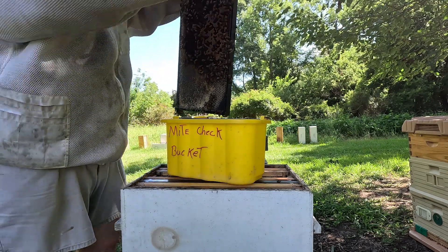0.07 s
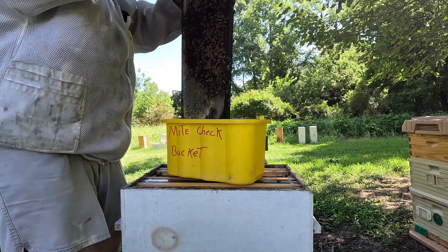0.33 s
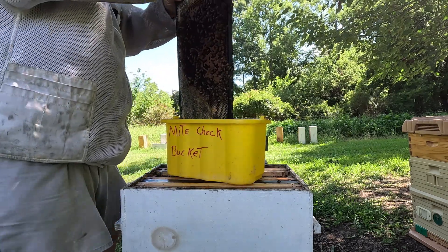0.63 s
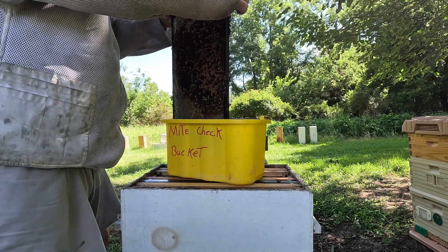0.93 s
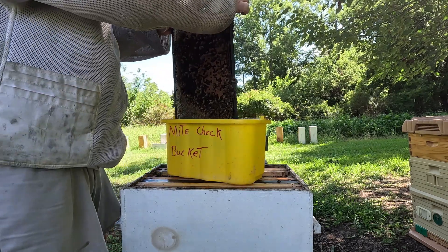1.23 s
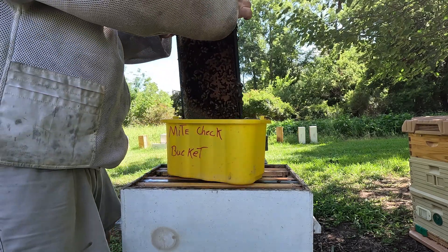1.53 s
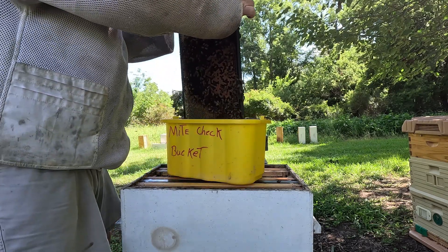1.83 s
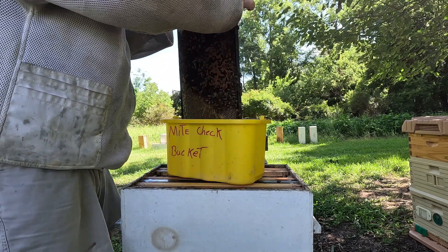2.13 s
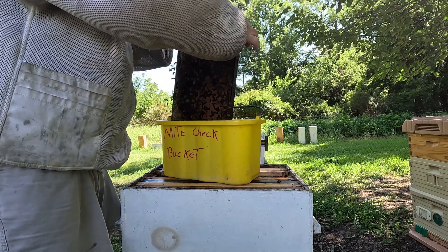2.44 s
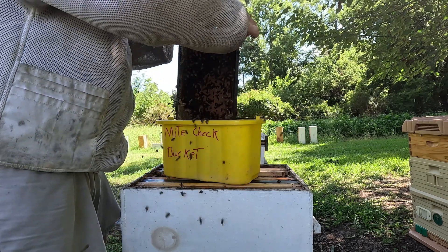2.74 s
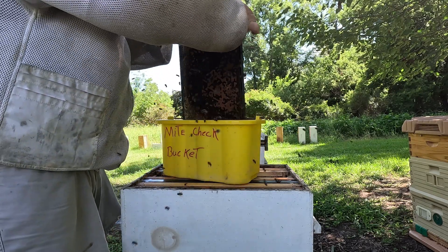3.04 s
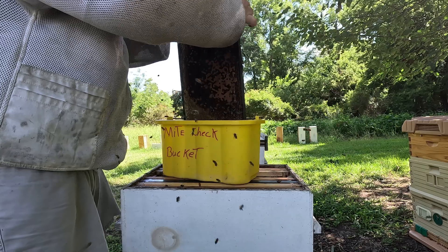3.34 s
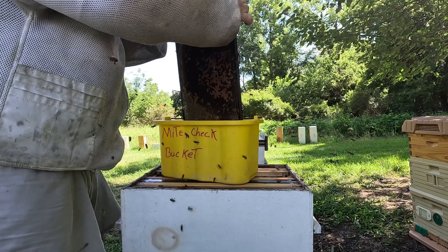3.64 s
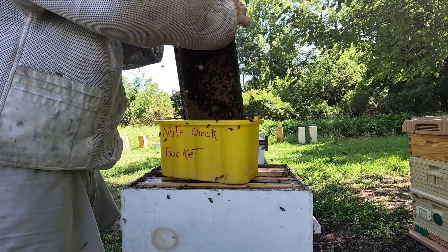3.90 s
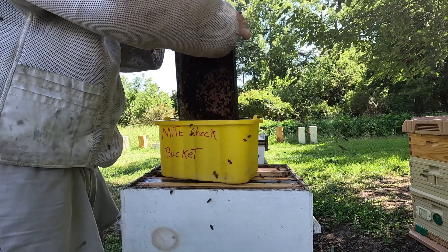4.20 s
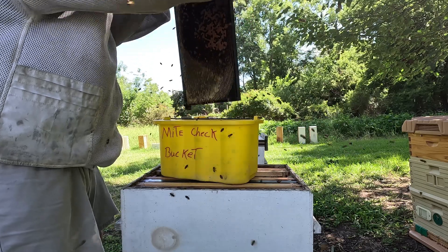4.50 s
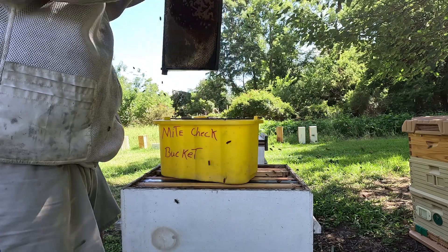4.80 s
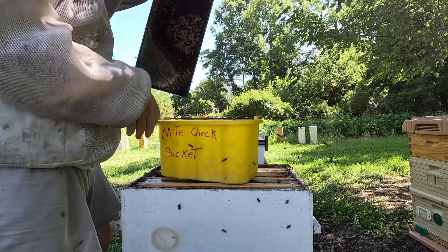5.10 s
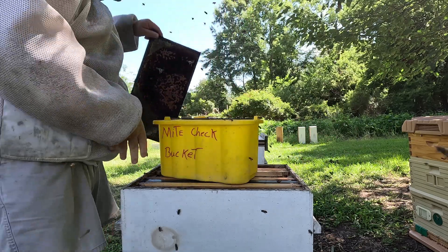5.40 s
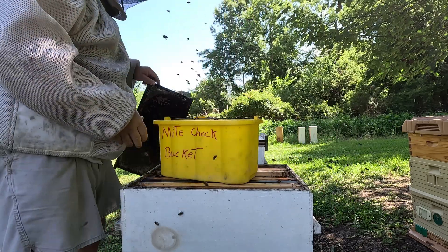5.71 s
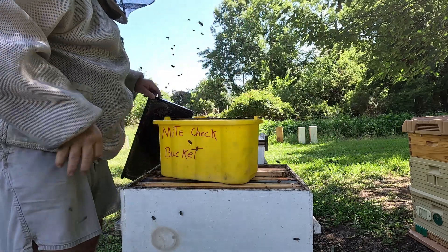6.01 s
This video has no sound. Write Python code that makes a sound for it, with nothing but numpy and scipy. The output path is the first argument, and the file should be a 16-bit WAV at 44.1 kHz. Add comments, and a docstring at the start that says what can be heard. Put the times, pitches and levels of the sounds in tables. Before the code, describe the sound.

Outdoors, insects hiss over a far rumble, with a soft sleeve swish, faint birds and a few light taps. Then a wooden hive frame is banged into a plastic bucket about seven times, each blow a crack and hollow boom with a short rattle, close and loud enough to overload the microphone. Steel clinks once. Bees patter on the plastic and rise into a buzz that continues after the knocking, some passing close.

```python
"""Outdoors at a beehive, a wooden frame is knocked hard into a plastic bucket standing on a hive box.
Each blow is a crack of wood, a clack of the wall and a hollow boom of bucket and box, with a rattle of
rebounds behind it; once a piece of steel clinks. Shaken bees patter on the plastic and buzz up in and
around the bucket, one pulse a wingbeat. Underneath: summer insect hiss, a far rumble, a few birds
and a brush of sleeve at the start. The big hits duck the mix and overload it."""
import sys
import numpy as np
from scipy import signal
from scipy.fft import rfft, irfft, next_fast_len
from scipy.io import wavfile
from scipy.ndimage import uniform_filter1d

SR = 44100
rng = np.random.default_rng(int(sys.argv[2]) if len(sys.argv) > 2 else 0)


def wav_out(sig):
    """Save sig, one row per channel (or a flat mono array), as 16-bit PCM at SR to the path in sys.argv[1]."""
    wavfile.write(sys.argv[1], SR, np.round(np.clip(np.atleast_2d(sig).T, -1, 1) * 32767).astype(np.int16))


N = 266893

# frame on bucket: t/s, force/dB, slap/dB and boom/dB over the force, hardness/(dB per octave),
# slap pitch ratio, first rebound/dB over the force
BLOWS = [(0.501, -27.5, 5, 9, -8, 0.86, -9), (.750, -44, 18.5, 3, 0, 1.08, -21),
         (0.784, -29.5, 10.5, 1, 6, 0.99, -14.5), (.927, -35.5, 7.5, 2, 6, 1.05, -16),
         (2.400, -4.5, 8, 17.5, 8, 1.04, -13), (2.407, 4, 12.5, -4.5, 5, 0.82, -17),
         (2.417, -1, 10.5, -13, 9, .68, -17), (2.433, -1.5, 3.5, -5, -17, .79, -21),
         (2.456, -6, 9.5, 8, 3.5, 1.02, -6), (2.487, -15, -6, 9, 2, .85, -7),
         (2.518, -15.5, -2, 6, 0, 1.3, -8), (2.592, -6.5, 7.5, -0.5, 13, 0.986, -15),
         (2.723, -34.5, 19.5, -3, 8, 1.15, -24), (2.921, -30, 15.5, -8, 4, 1.04, -28),
         (2.982, 1, 13, 4.5, -4.5, 1.045, -14), (3.067, -24, 13, -1, -3, 1.09, -23),
         (3.159, -21.5, 6, 3, 3, 1, -14), (3.294, -1, 14.5, 5, -0.5, 1.06, -13),
         (3.445, -28.5, 14, 5, 2, 1.08, -11), (3.544, 0.5, 16, 5.5, -0.5, 1.029, -13.5),
         (3.622, -19.5, 5, 11, -1, 0.94, -4), (3.664, -14, 3.5, -2, 1, 1.13, -9.5),
         (3.778, -19.5, 10, -3, 2, 0.78, -24), (3.806, -3, 6, 2.5, 6.5, 1.02, -10),
         (3.951, -28, -7, -12, 2, 1.1, -30), (4.033, -1, 13, 5.5, 0.5, 1.013, -11.5),
         (4.278, -2.5, 9.5, 10.5, 2, 1.05, -12), (4.322, -11, 17, -5, 1, 0.97, -5.5),
         (4.337, -15.5, -3, -4, 11, 2, -17), (4.457, -33.5, 30.5, 16, 1, 0.84, -28)]
# resonances: f/Hz, relative level/dB, t60/s
BOOM_MODES = [(100.1, -14.5, 0.18), (126.4, -13, 0.2), (167.6, -11.5, 0.16), (214, -1, .15),
              (256, -2.5, 0.15), (317.3, 0.5, 0.13), (352.4, -4, 0.13), (394, -4.5, 0.085),
              (429, -19, 0.25), (482.5, -18.5, 0.29)]  # bucket and hive box
WALL_MODES = [(634, -37, 0.038), (703, 4.5, 0.098), (745, -2, 0.039), (880, -22, 0.045), (905, -6, .06),
              (1115, -3.5, 0.099), (1198, -12, 0.054), (1412, -6.5, 0.1), (1943, -18, 0.086),
              (2420, -10.5, 0.035)]  # plastic wall
STEEL_MODES = [(3280, -3, .08), (4360, 25, 0.018), (4660, -9, .1), (7100, 1, 0.11), (8350, 0, 0.11),
               (10620, -6, 0.088), (10800, -10, 0.21), (11750, -9, 0.14), (12600, 1, 0.17),
               (13260, 2, 0.11), (15130, -7, .18)]  # the clink
# EQ curves: f/Hz, relative level/dB
CLACK_EQ = [(300, -16), (560, 7.5), (740, 4), (1150, 3.5), (1700, -4), (2400, -12.5), (2900, -24.5),
            (6000, -69)]  # dense ringing of the wall
CRACK_EQ = [(1200, -2.5), (2300, -15), (2900, -2.5), (4300, -1), (6000, -6.5), (8000, -12.5),
            (11000, -22.5), (16000, -28)]  # wood on impact
PATTER_EQ = [(250, -14), (420, 2), (560, 1), (720, 11), (1100, 4), (1600, -6.5), (2400, -3.5),
             (3200, -25.5), (5000, -33), (12000, -61)]  # bees landing on plastic
HUM_EQ = [(150, -41), (225, -11), (320, 18.5), (425, -1), (490, 2.5), (560, -8.5), (690, -19), (850, -22),
          (2000, -72)]  # bees in the bucket and close by
RASP_EQ = [(150, -23), (240, 7), (290, -3.5), (350, 3.5), (480, 9), (560, -1.5), (700, 1), (900, -1.5),
           (1150, -1.5), (1650, -5), (2100, -10.5), (2700, -16), (4500, -45), (8000, -51), (16000, -42)]  # bees in flight
RUSTLE_EQ = [(300, -14), (1200, 16.5), (2700, 1), (4500, 2.5), (7500, -2), (10000, -0.5), (11500, -8),
             (15500, -10)]  # wings and legs
INSECT_EQ = [(1800, -26), (2550, -6), (2900, 0.5), (3900, -2.5), (4650, 0.5), (5100, -1), (6000, -0.5),
             (7500, -7.5), (8600, -1.5), (9300, -7), (10500, -3.5), (11300, -16), (16000, -21)]  # summer hiss
RUMBLE_EQ = [(12, -44), (20, -14.5), (97, -6), (151, -13.5), (200, -7.5), (221, -20), (299, -16),
             (380, -11), (464, -20), (782, -23), (1190, -27), (1400, -27.5), (2090, -32.5), (2220, -33.5),
             (2400, -39.5), (3120, -49), (5280, -120)]  # far low end
# single bees passing close: t/s, wingbeat f/Hz, glide/(Hz per s), level/dB
FLYBYS = [(4.52, 207.2, 97.5, -31), (4.72, 214, -60.5, -35.5), (4.955, 218.8, 109.5, -35.5),
          (5.12, 214, 18.5, -39), (5.322, 216.2, -130, -33.5), (5.44, 213.7, -89.5, -37.5),
          (5.78, 222, 90, -44)]
# a bird's two-note call: t/s, upslur level/dB, whistle level/dB
BIRD_CALLS = [(.342, -58, -58.5), (.756, -58, -58.5), (1.01, -49, -64.5), (1.70, -59, -60.5),
              (1.963, -53, -67)]
# its two notes: delay/s, length/s, start f/Hz, middle f/Hz, end f/Hz
CALL_NOTES = [(0, 0.03, 2270, 2420, 2560), (0.061, 0.1, 2177, 2085, 2110)]
# another bird's thin high whistles: t/s, length/s, start f/Hz, middle f/Hz, end f/Hz, level/dB
WHISTLES = [(0.527, 0.3, 6330, 6630, 6570, -58.5), (1.58, .18, 6740, 6800, 7000, -64),
            (5.03, 0.27, 6820, 6800, 6700, -58.5)]
# crickets and katydids that stand out of the hiss: f/Hz, level/dB
SHRILLS = [(2900, -66), (4330, -62.5), (4680, -62.5), (5180, -74), (8600, -64.5)]


def frame_contacts(rebounds=3, first_gap_s=.013, slowing=1.6, loss_db=2.5):
    """The loose frame hits and rebounds, the gaps widening as the bounces die away."""
    touches = []
    for s, force_db, slap_db, boom_db, hardness, pitch, rebound_db in BLOWS:
        touches.append((s, force_db, slap_db, boom_db, hardness, pitch))
        for k, (late, loud, sharp) in enumerate(rng.uniform(-1.001, 1, (rebounds, 3)), 1):
            delay = first_gap_s * k ** slowing * (1 + .06 * late)
            db = force_db + rebound_db - loss_db * (k - 1) + 2 * loud
            touches.append((s + delay, db, 5.5, 1.5, 3.3, 1 + .22 * sharp))  # columns as for the blow
    # t/s, force/dB, slap level/dB, boom level/dB, hardness/(dB per octave), slap pitch ratio
    return [(s, db, db + slap_db, db + boom_db, hardness, pitch)
            for s, db, slap_db, boom_db, hardness, pitch in touches]


def knocks(hits, slap_hz=359.7, panel_hz=714, give_s=.0035):
    """The wood cracks at once, the bucket wall clacks, and the bottom gives way into a hollow boom."""
    out, t = np.zeros(N), np.arange(SR // 4) / SR
    give = 1 - np.exp(-(t / give_s) ** 2)
    wall_attack = 1 - np.exp(-t / .0014)
    for s, force_db, slap_db, boom_db, hardness, pitch in hits:
        # the bottom makes a few damped swings
        slap = amp(slap_db) * fade(t, t60=.047) * np.sin(2 * np.pi * slap_hz * pitch * t)
        flex = rng.uniform(.972, 1.025)
        boom = amp(boom_db) * ring(BOOM_MODES, t, spread_db=2.5, pitch=flex)
        # a heavy blow presses the frame on the tautest panel and damps it: its ring grows less
        panel = amp(-17 + .69 * force_db) * fade(t, t60=.15) * np.sin(2 * np.pi * panel_hz * flex * t)
        wall = ring(tilted(WALL_MODES, hardness), t, spread_db=4, pitch=flex) * wall_attack
        clack = noise(tilted(CLACK_EQ, hardness), len(t))
        clack *= rattle(t, t60=.055, tail_db=-17, tail_t60=.14)
        # a soft contact lasts longer, so its crack is duller; a hard one cracks louder
        crack = noise(tilted(CRACK_EQ, .19 * min(force_db, 0)), len(t))
        crack *= amp(force_db - 22 + .86 * hardness) * rattle(t, t60=.017, tail_db=-9.5, tail_t60=.097)
        add(out, s, give * (slap + boom + panel) + amp(force_db - 9) * (wall + clack) + crack)
    return out


def rattle(t, t60, tail_db, tail_t60):
    """Envelope of a contact: a snap, a quick decay, then the uneven chatter of the loose frame."""
    attack = 1 - np.exp(-t / .0004)
    clumps = amp(3 * unit(uniform_filter1d(rng.standard_normal(len(t)), size=150)))
    return attack * (fade(t, t60) + amp(tail_db) * clumps * fade(t, tail_t60))


def steel_clink(at_s=2.593, level_db=-15):
    """Struck steel rings short and bright."""
    out, t = np.zeros(N), np.arange(SR // 4) / SR
    add(out, at_s, amp(level_db) * ring(STEEL_MODES, t, spread_db=.56))
    return out


def swarm(stir_s=2.4, lift_s=4.14, settle_s=5.4):
    """Stirred by the first hard blow, bees hum at the bucket's resonance; fliers beat faster and rasp."""
    hum = colour(wings(212.8, spread=.056, waver=.036, swing_db=3, count=10), HUM_EQ)
    rasp = colour(wings(238, spread=.13, waver=.04, swing_db=3, count=18), RASP_EQ)
    rustle = noise(RUSTLE_EQ) * amp(drift(150) + .59 * drift(14))
    t = np.arange(N) / SR
    roused, lifted = ramp(stir_s, rise_s=.35), ramp(lift_s, rise_s=.41)
    hum_db = -80 + 44.5 * roused - .93 * np.maximum(t - stir_s, 0)
    # as the frame is lifted out more bees fly, and wings and legs rustle, then settle
    rasp_db = -64 + (23 + lifted) * roused
    rustle_db = -67 + 21 * lifted - 3 * np.maximum(t - settle_s, 0)
    return hum * amp(hum_db) + rasp * amp(rasp_db) + rustle * amp(rustle_db)


def wings(beat_hz, spread, waver, swing_db, count):
    """Each bee makes one pulse a wingbeat, on its own wavering pitch, coming nearer and moving off."""
    out = np.zeros(N)
    for offset in np.linspace(-1, 1, count):
        hz = beat_hz * np.exp(spread * offset + waver * (drift(7) + .3 * drift(40)))
        beats = np.cumsum(hz) / SR + rng.random()
        at = np.flatnonzero(np.diff(np.floor(beats)))
        early = (beats[at + 1] % 1) / (beats[at + 1] - beats[at])  # the pulse falls between two samples
        size = amp(swing_db * drift(4.7)[at])
        out[at] += size * early
        out[at + 1] += size * (1 - early)
    return low_cut(out, hz=130)


def flybys(width_s=.035):
    """One bee at a time swells out of the swarm, its pitch gliding as it passes."""
    out, t = np.zeros(N), np.arange(N) / SR
    for s, hz, glide, db in FLYBYS:
        passage = (t - s) / width_s
        beat_hz = hz + glide * width_s * 2 * np.tanh(passage / 2)
        bee = colour(wings(beat_hz, spread=0, waver=.008, swing_db=-1.5, count=1), HUM_EQ)
        out += bee * amp(db) * np.exp(-.5 * passage ** 2)
    return out


def falling_bees(hits, fall_s=.028, peak_per_s=1500, spots=8, level_db=-45):
    """Each jolt shakes bees off the comb; a moment later they patter softly on the plastic."""
    shower, t = np.zeros(N), np.arange(SR // 2) / SR
    for s, _, slap_db, *_ in hits:
        add(shower, s, amp(slap_db) * t / fall_s * np.exp(-t / fall_s))
    shower = np.sqrt(shower / shower.max())  # a harder jolt throws more bees, and faster
    landings = (rng.random(N) < peak_per_s / SR * shower) * shower * rng.uniform(.3, 1, N)
    spot, tick_t = rng.integers(0, spots, N), t[:SR // 20]
    patter = np.zeros(N)
    for k in range(spots):
        tick = noise(PATTER_EQ, len(tick_t)) * fade(tick_t, t60=.042)
        patter += signal.oaconvolve(landings * (spot == k), tick)[:N]
    return amp(level_db) * unit(patter)


def sleeve():
    """The sleeve slides on the suit while the frame is lowered: one soft, grainy swish."""
    cloth = noise([(300, -18), (900, -4), (1800, 4), (2800, -9), (9000, -12), (14000, -28)])
    swish_db = np.interp(np.arange(N) / SR, [0, .18, .25, .32, .5], [-53.5, -46.5, -54, -81, -93])
    return cloth * amp(swish_db + 2.7 * drift(110))


def birds():
    """Thin gliding whistles from the trees, fluttering on their way through the leaves."""
    out = np.zeros(N)
    notes = [(s + delay, *shape, db)
             for s, *levels in BIRD_CALLS for (delay, *shape), db in zip(CALL_NOTES, levels)]
    for s, length, start_hz, middle_hz, end_hz, db in notes + WHISTLES:
        progress = np.linspace(0, 1, round(length * SR))
        contour = np.polyfit([0, .5, 1], [start_hz, middle_hz, end_hz], 2)
        hz = np.polyval(contour, progress) * (1 + .0021 * drift(113)[:len(progress)])
        swell = np.sqrt(2 * abs(np.sin(np.pi * progress)))
        flutter_db = 4 * drift(81)[:len(progress)]
        add(out, s, amp(db + flutter_db) * swell * np.sin(2 * np.pi * np.cumsum(hz) / SR))
    return out


def far_rumble(engine_hz=96):
    """The low bed: a slowly heaving rumble and the wavering drone of a distant engine."""
    rumble = noise(RUMBLE_EQ) * amp(-43.5 + .61 * drift(2.9))
    hz = engine_hz * (1 + .04 * drift(14))
    drone = np.sin(2 * np.pi * np.cumsum(hz) / SR) * amp(-48 + 2 * drift(12))
    return rumble + drone


def insects():
    """The high bed: steady summer hiss, with crickets and katydids as narrow, shimmering bands."""
    t = np.arange(N) / SR
    shrill = sum(amp(db) * drift(220) * np.sin(2 * np.pi * hz * t + 2 * drift(60)) for hz, db in SHRILLS)
    return shrill + noise(INSECT_EQ) * amp(-51.5 + .48 * drift(29))


def scatter(x, wet_db, t60):
    """Hives and trees throw back a faint dull tail."""
    t = np.arange(SR) / SR
    build = 1 - np.exp(-t / .01)
    tail = noise([(80, 8.5), (300, 0), (1500, 0), (4000, .5), (12000, -6.5)], len(t))
    tail *= fade(t, t60) * build
    return x + amp(wet_db) * signal.fftconvolve(x, tail / np.linalg.norm(tail))[:N]


def ring(modes, t, spread_db, pitch=1):
    """Dying modes; the place of the blow weights them a little differently each time."""
    hz, db, t60 = np.transpose(modes)[:, :, None]
    weight = amp(db + spread_db * rng.standard_normal(db.shape))
    partials = weight * fade(t, t60) * np.sin(2 * np.pi * hz * pitch * t)
    return partials.sum(0) / np.linalg.norm(amp(db))


def tilted(rows, db_per_octave):
    """Tilts an EQ curve or a set of modes: bright for a hard contact, dark for a soft one."""
    return [(hz, db + db_per_octave * np.log2(hz / rows[0][0]), *rest) for hz, db, *rest in rows]


def colour(x, eq):
    """Runs x through an EQ curve, at rms 1."""
    hz, db = np.transpose(eq)
    size = next_fast_len(len(x))
    f = np.fft.rfftfreq(size, 1 / SR)
    gain = amp(np.interp(np.log(f + 1), np.log(hz), db))
    return unit(irfft(rfft(x, size) * gain, size)[:len(x)])


def noise(eq, size=N):
    """Coloured noise of rms 1."""
    return colour(rng.standard_normal(size), eq)


def low_cut(x, hz):
    """Rolls off the bass at 12 dB an octave."""
    return signal.sosfilt(signal.butter(2, hz, "high", fs=SR, output="sos"), x)


def drift(per_s):
    """A random wander through per_s new values a second."""
    return np.interp(np.arange(N) / SR * per_s, np.arange(2048), rng.standard_normal(2048))


def fade(t, t60):
    """Free decay, 60 dB down at t60."""
    return np.exp(-np.log(1000) * t / t60)


def ramp(start_s, rise_s):
    """Goes from 0 to 1 and holds."""
    return np.clip((np.arange(N) / SR - start_s) / rise_s, 0, 1)


def amp(db):
    """Decibels to gain."""
    return 10 ** (np.asarray(db) / 20)


def unit(x):
    """Scales to rms 1."""
    return x / np.sqrt(np.mean(x ** 2) + 1e-20)


def add(mix, s, sound):
    """Mixes a sound in at time s."""
    part = mix[max(round(s * SR), 0):][:len(sound)]
    part += sound[:len(part)]


def scene():
    """The mono mix: knocks up front and nearly dry, birds set back, bees and the beds around them."""
    hits = frame_contacts()
    impacts = low_cut(knocks(hits) + steel_clink(), hz=85)  # a small body radiates little bass
    nearby = scatter(impacts + falling_bees(hits), wet_db=-19, t60=.17)
    far = scatter(birds(), wet_db=-6.5, t60=.26)
    return (nearby + far + swarm() + flybys() + far_rumble() + insects() + sleeve())[None]


def record(dry, threshold_db=-14, duck_share=.31, recover_db_per_s=22, knee=11, top_hz=16000):
    """Gain control ducks after loud blows, the first swings still overload, then the top is cut."""
    power = signal.lfilter([1 / 256], [1, -255 / 256], dry[0] ** 2)
    power_db = 10 * np.log10(abs(power) + 1e-12)
    fall_db = np.arange(N) / SR * recover_db_per_s
    held_db = np.maximum.accumulate(power_db + fall_db) - fall_db  # catches each peak, then sinks
    ducked = dry * amp(-duck_share * np.maximum(held_db - threshold_db, 0))
    clipped = .97 * ducked / (1 + abs(ducked) ** knee) ** (1 / knee)
    high_cut = signal.firwin(401, top_hz, window=("kaiser", 8), fs=SR)
    return signal.oaconvolve(clipped, high_cut[None], "same")


dry = scene()
out = record(dry)
wav_out(out)
```